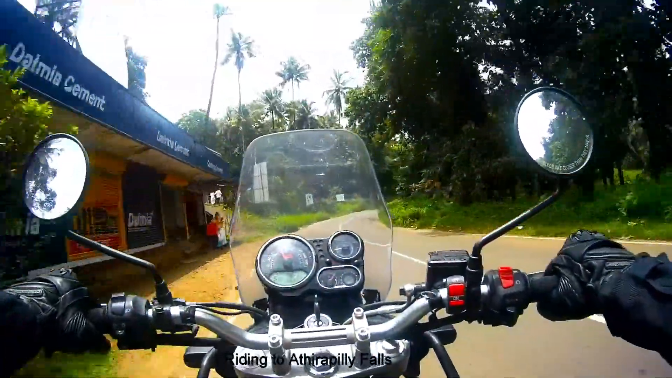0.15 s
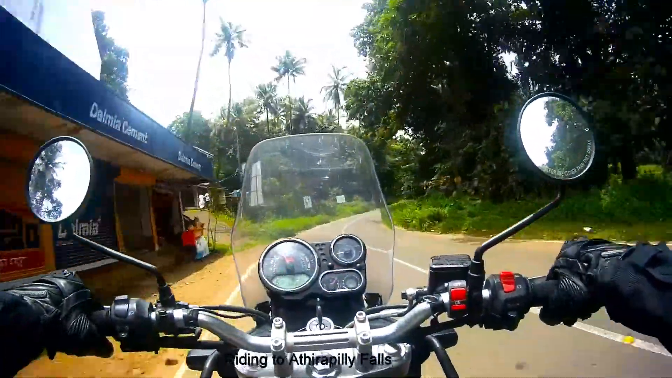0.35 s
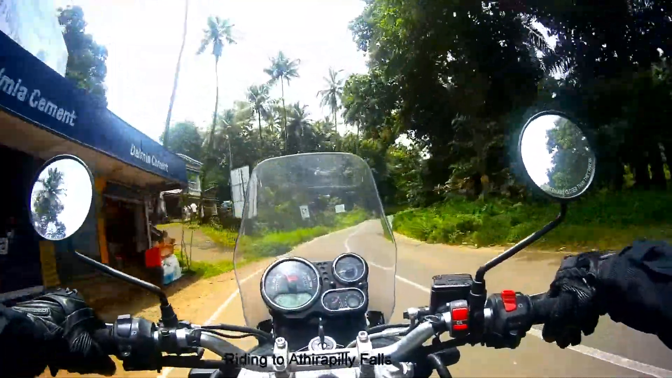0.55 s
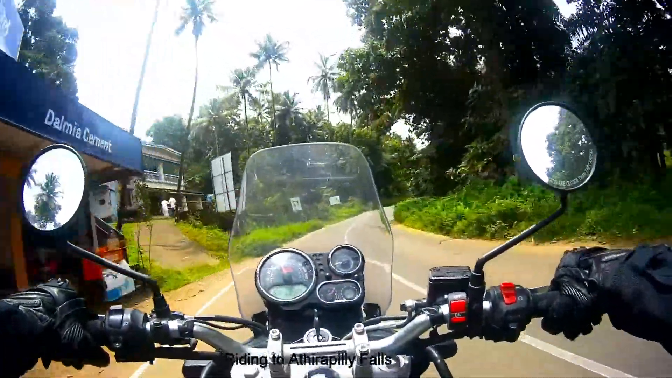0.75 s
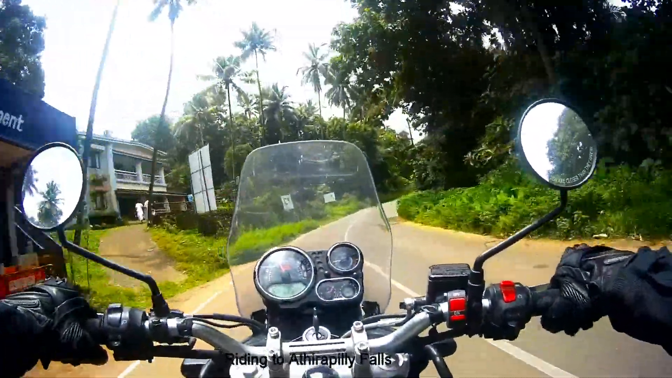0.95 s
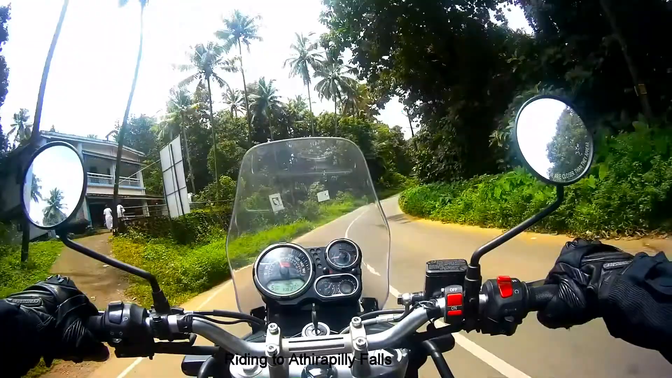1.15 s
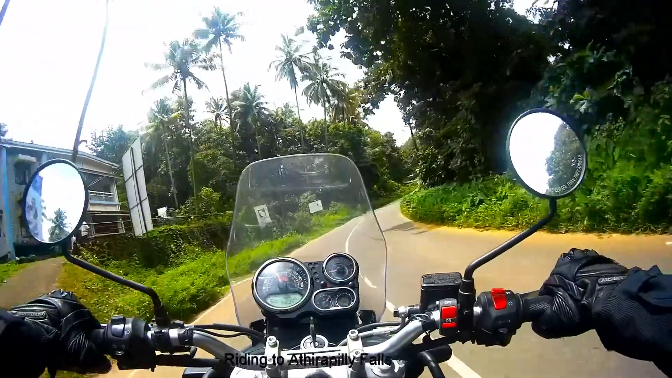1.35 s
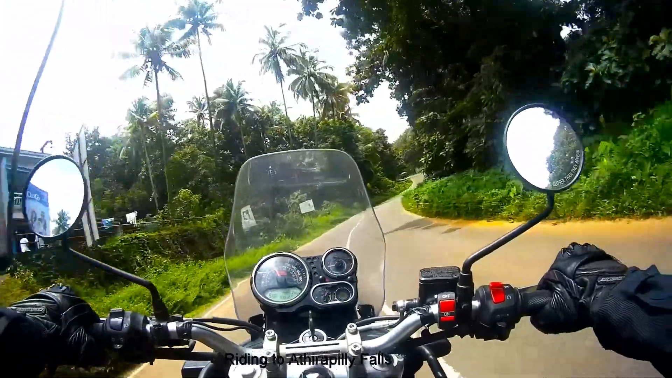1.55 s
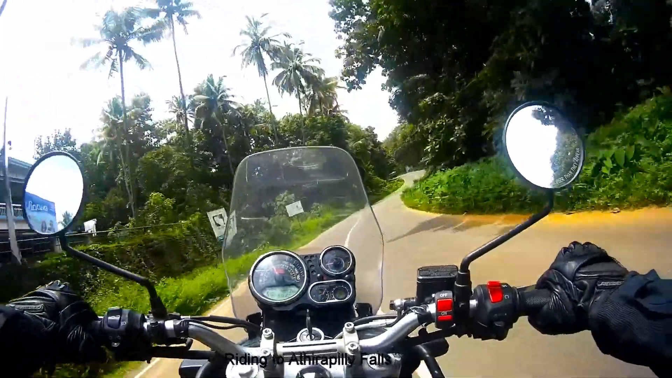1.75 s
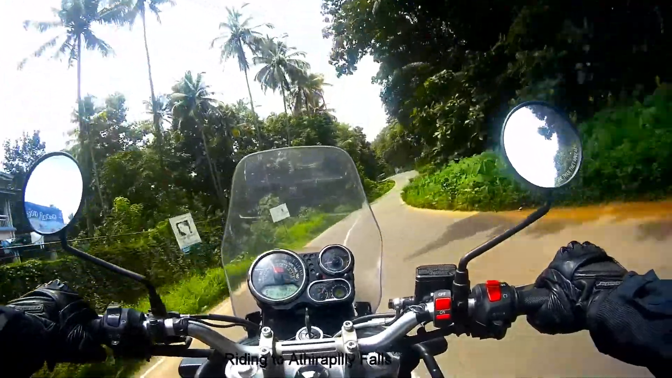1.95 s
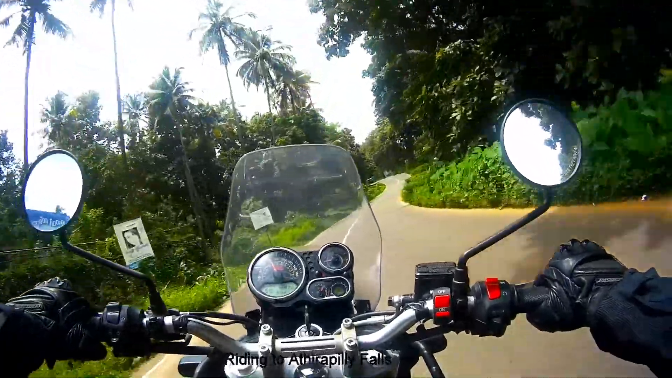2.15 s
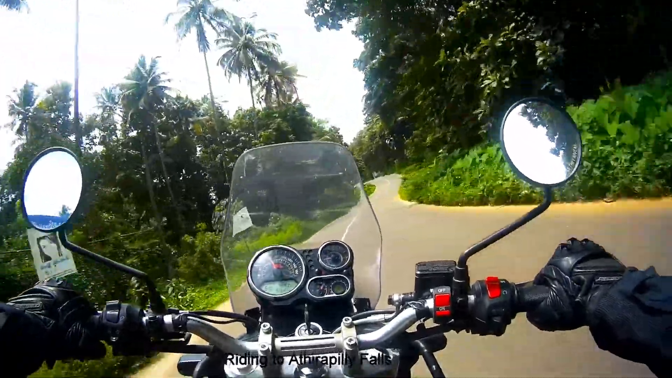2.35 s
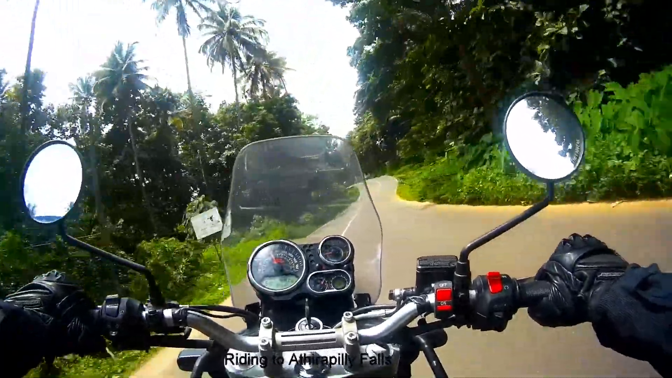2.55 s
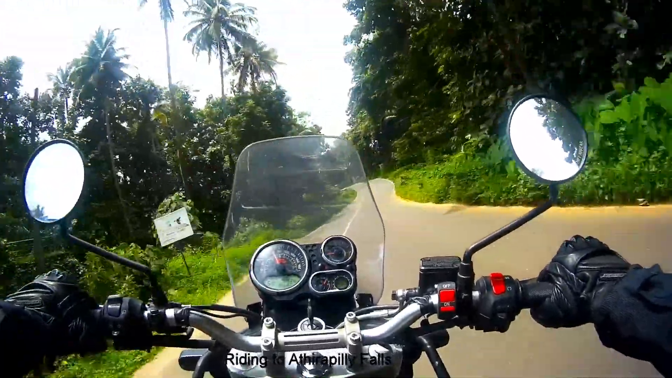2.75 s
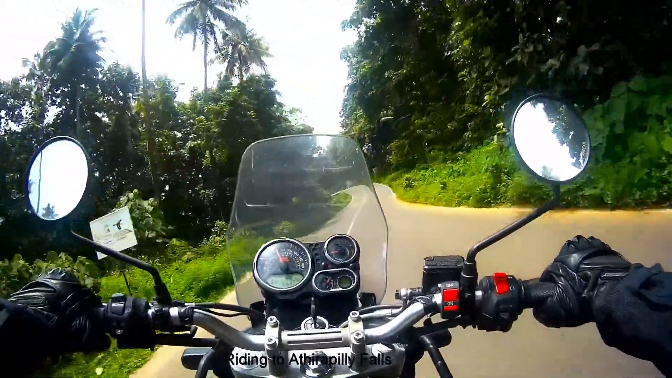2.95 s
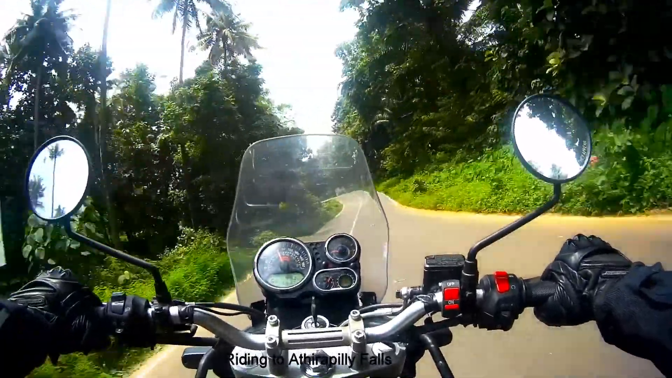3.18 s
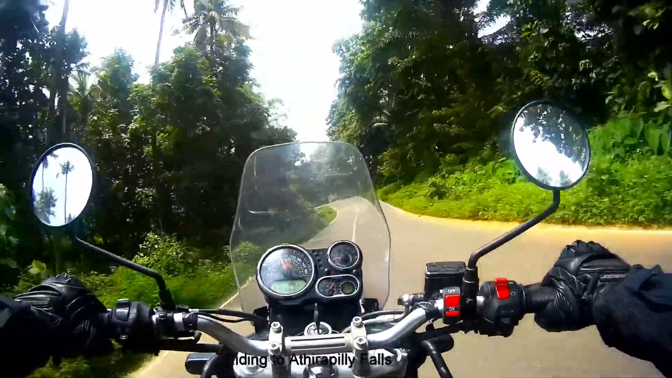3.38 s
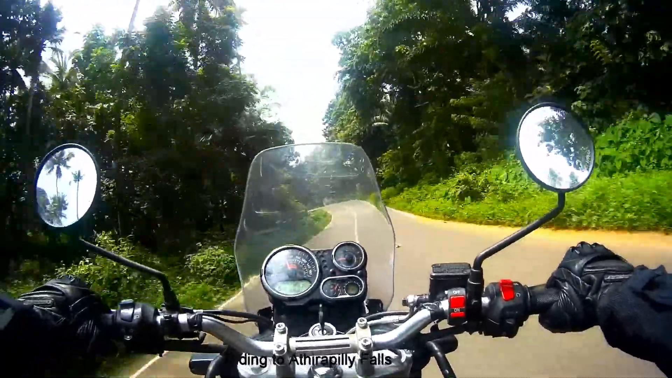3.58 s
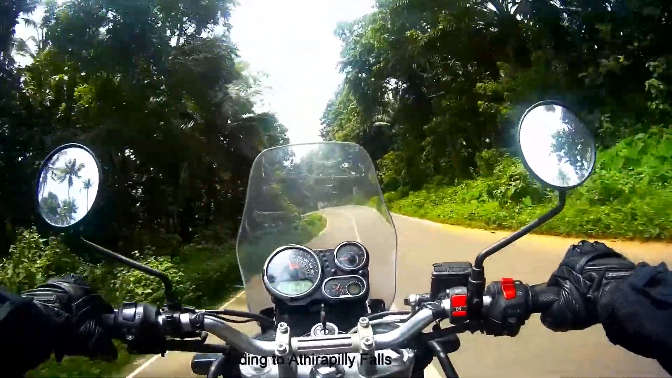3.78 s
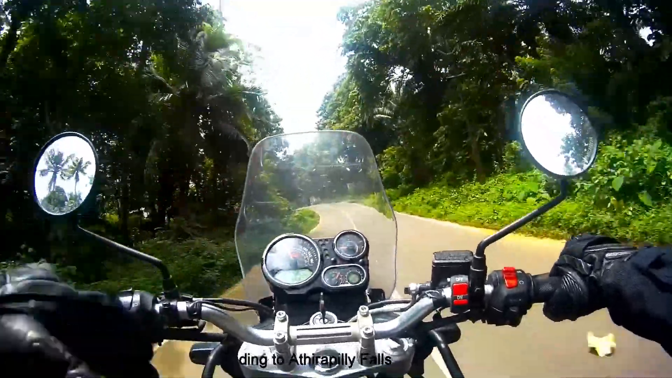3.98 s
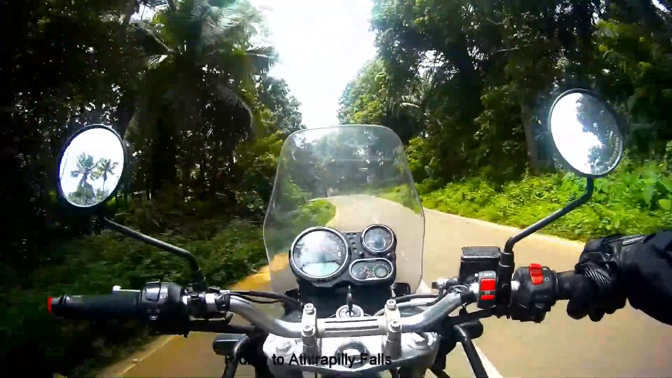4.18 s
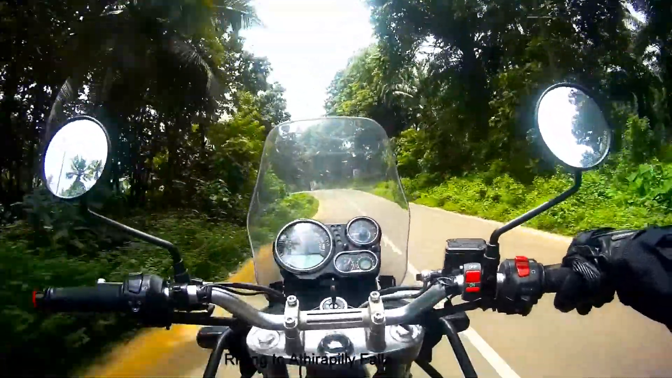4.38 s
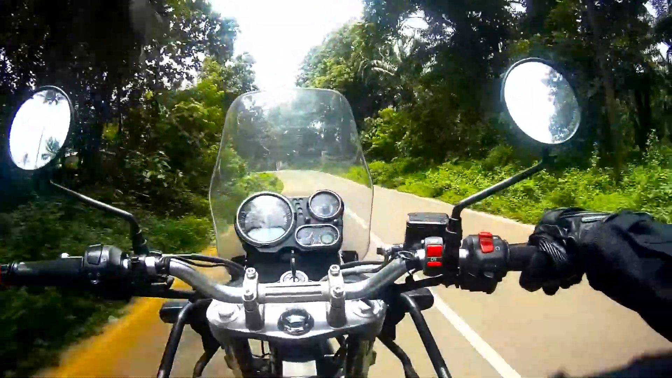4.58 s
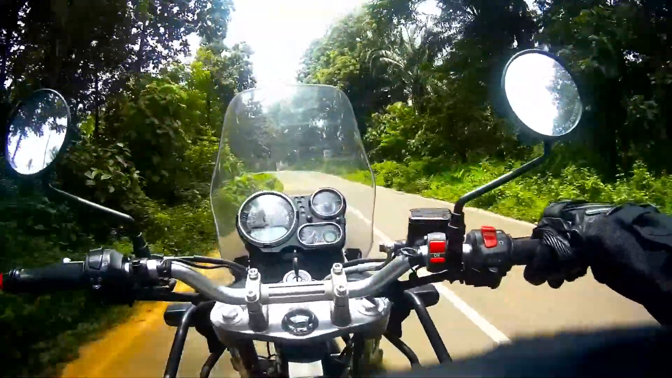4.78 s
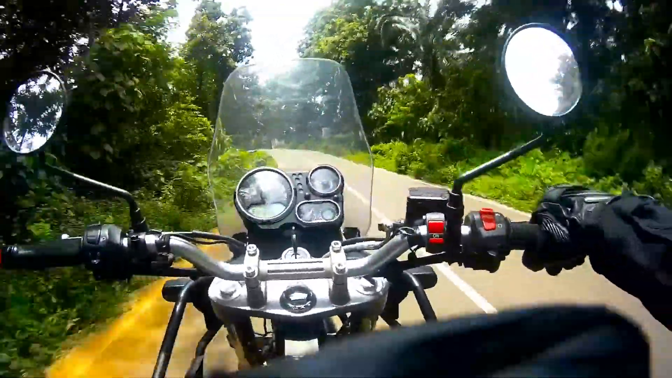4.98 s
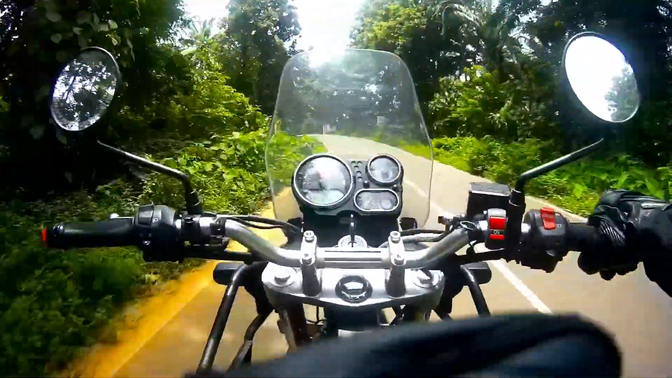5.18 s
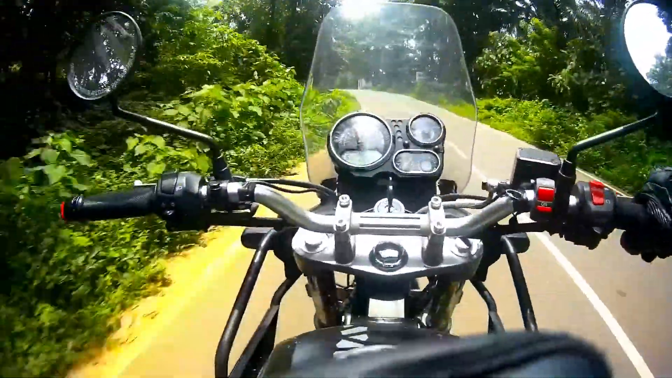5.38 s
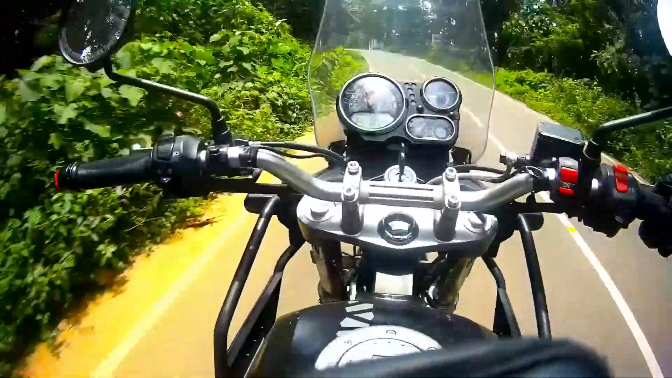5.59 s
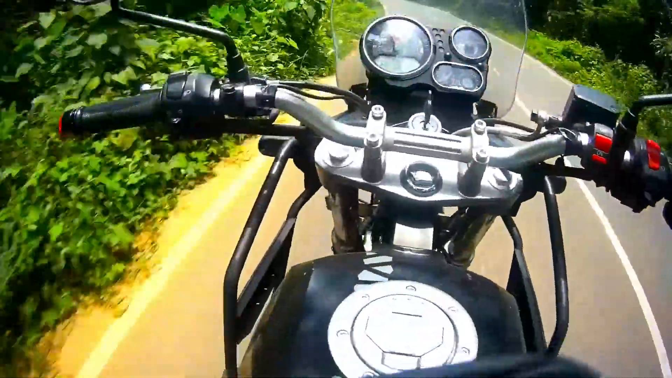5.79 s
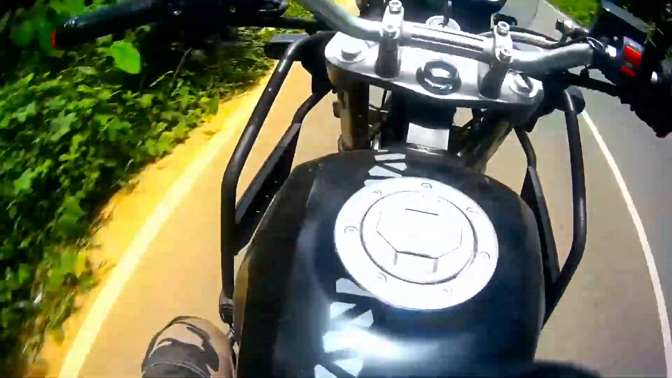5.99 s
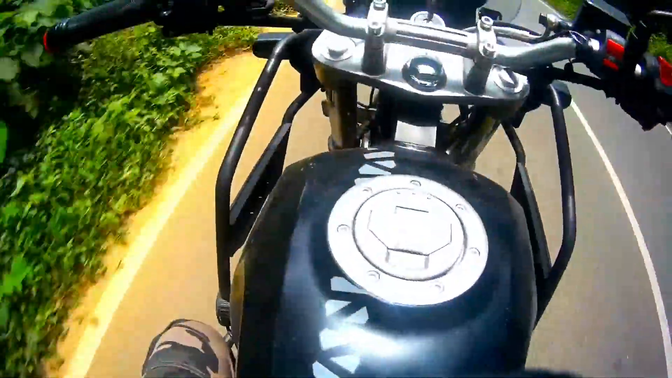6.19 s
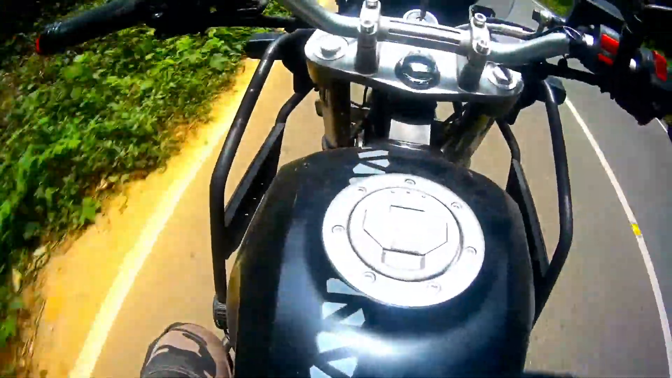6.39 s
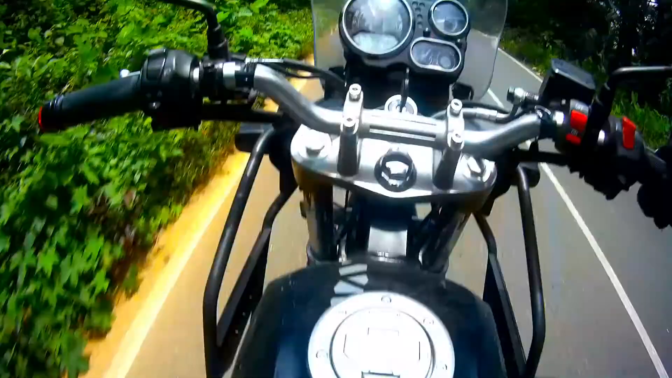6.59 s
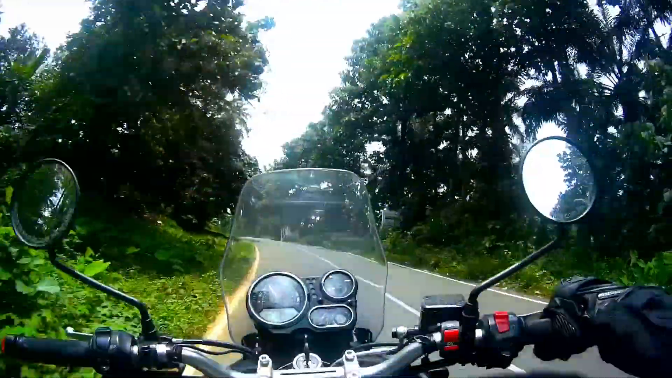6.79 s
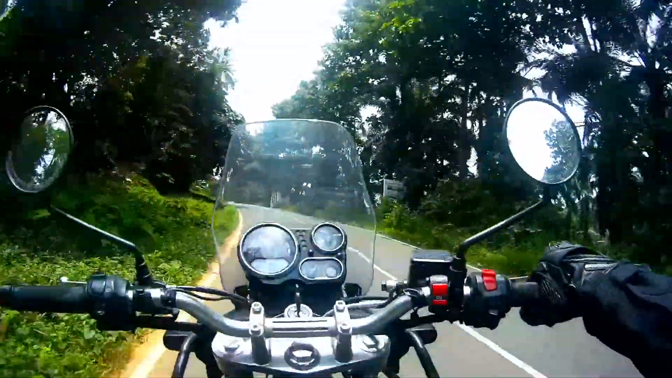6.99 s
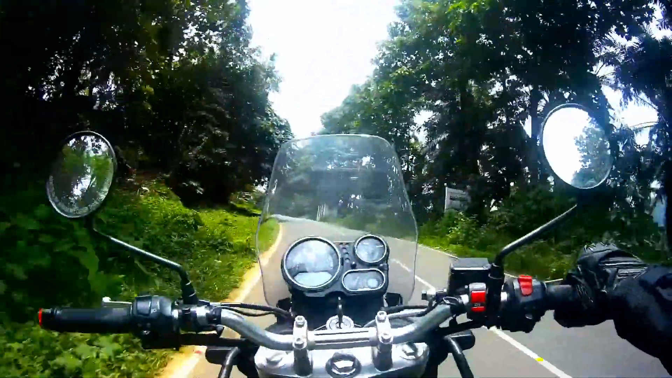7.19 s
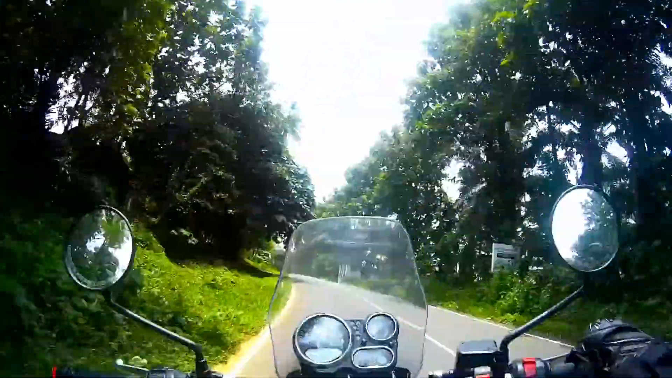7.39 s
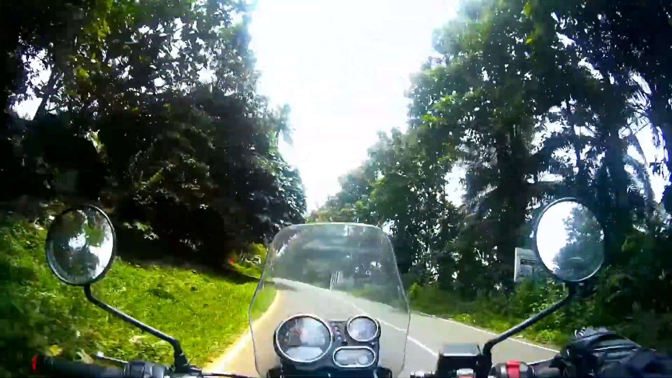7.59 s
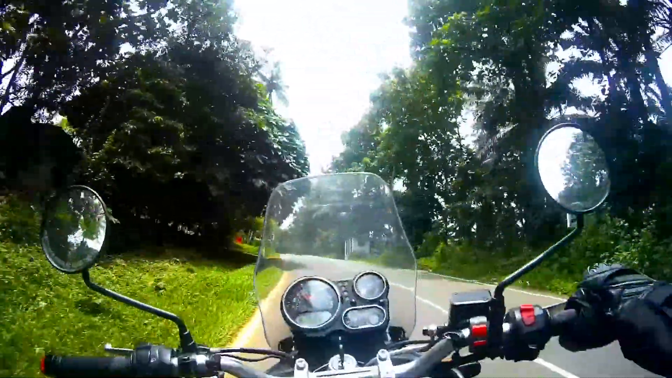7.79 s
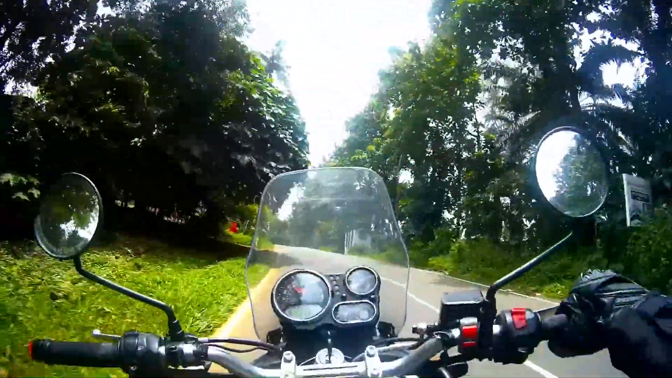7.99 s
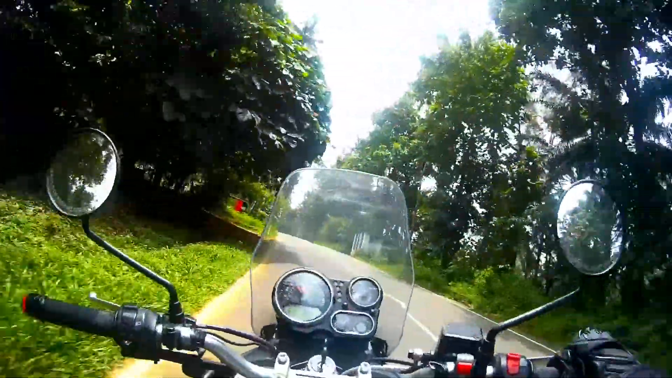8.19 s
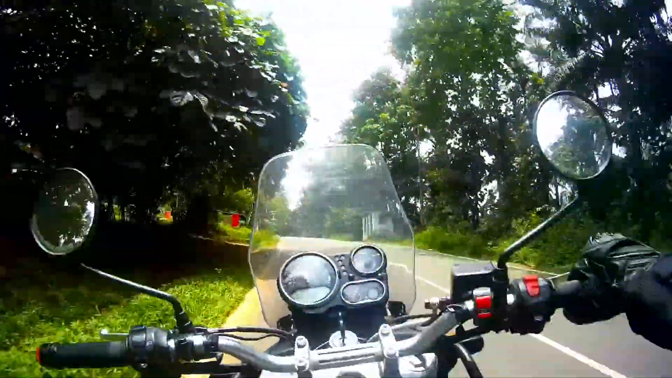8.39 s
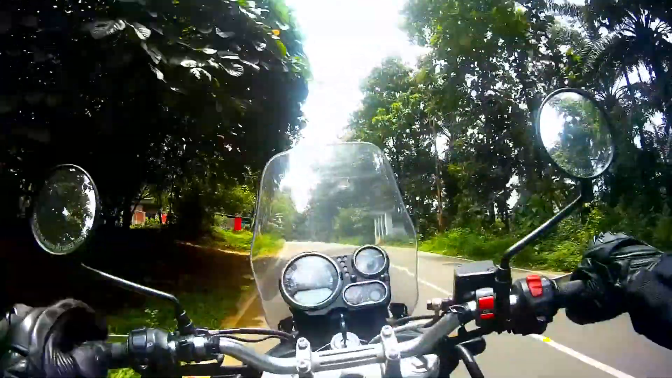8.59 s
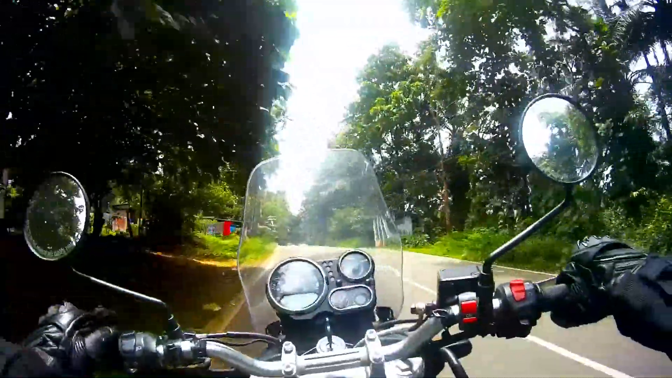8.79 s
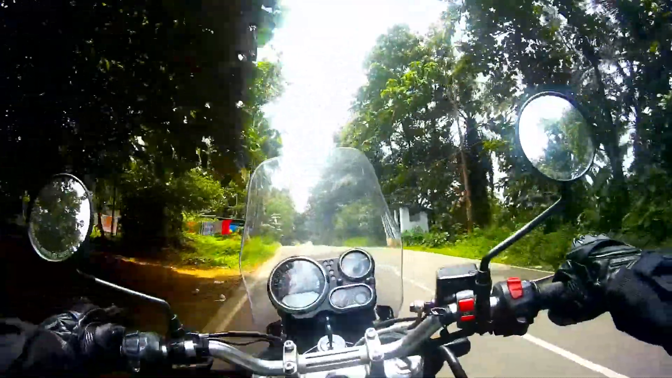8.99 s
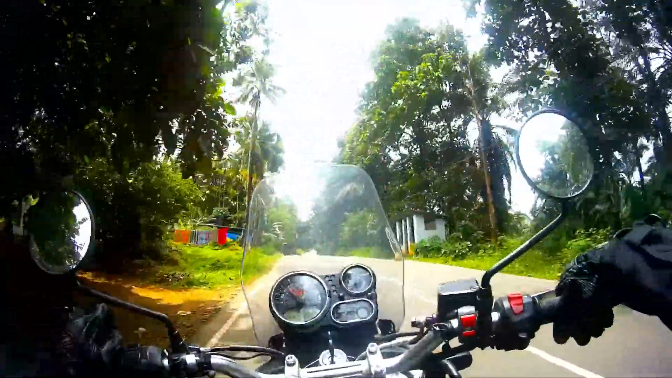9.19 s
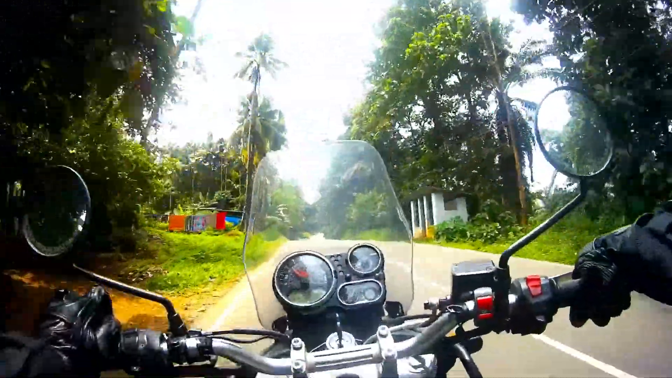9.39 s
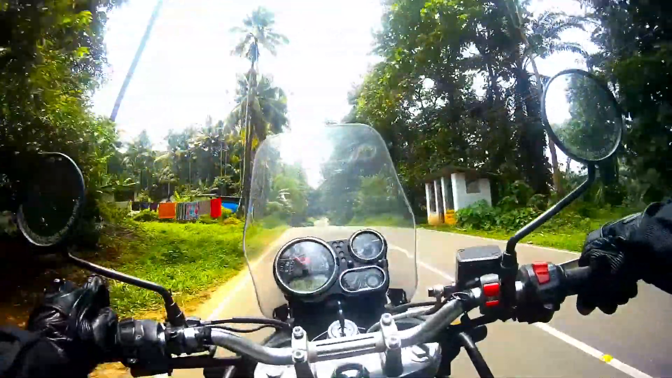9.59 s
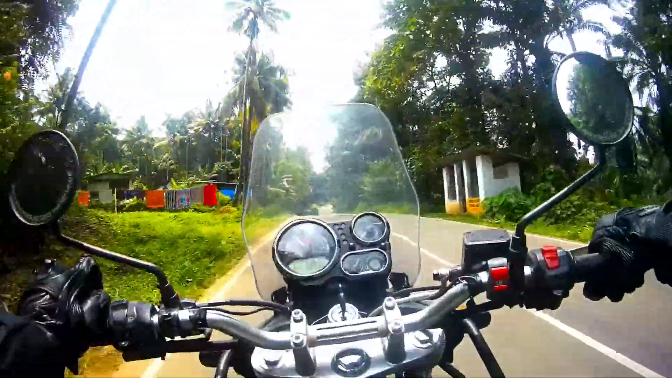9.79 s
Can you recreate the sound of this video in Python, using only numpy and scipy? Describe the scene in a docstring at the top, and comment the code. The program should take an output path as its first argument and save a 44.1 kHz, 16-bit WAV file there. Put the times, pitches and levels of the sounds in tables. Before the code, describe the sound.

A single-cylinder motorcycle drones steadily under lumpy wind buffeting, then a gloved hand rubs and knocks the camera's plastic case in two bouts.

```python
"""On a country road, a single-cylinder motorcycle cruises, heard from a cased camera on the rider.
Engine clatter is noise pulsed by the firings and lifted by the case resonances; the throttle eases,
opens again and closes. Wind is lumpy noise, split into large and small eddies, over a soft rush.
A gloved hand takes hold of the camera and tilts it: stick-slip jerks rub the case, seams snag on it,
knocks ring its modes and shoves thump it."""
import sys
import numpy as np
from scipy import signal
from scipy.fft import rfft, irfft, next_fast_len
from scipy.io import wavfile
from scipy.ndimage import uniform_filter1d, map_coordinates

SR = 44100
rng = np.random.default_rng(int(sys.argv[2]) if len(sys.argv) > 2 else 0)


def generate_wav(signal):
    """Clip the signal to [-1, 1] and save it as 16-bit WAV at the path in sys.argv[1]."""
    frames = np.transpose(np.atleast_2d(signal))
    scaled = np.clip(frames, -1, 1) * 32767
    pcm = np.round(scaled).astype(np.int16)
    wavfile.write(sys.argv[1], SR, pcm)


N = 434385
TIME = np.arange(N) / SR

# Airflow past the rider, which drives both the buffeting and the rush.
# Each row: time [s], airflow level before each layer's trim [dB].
AIRFLOW = [(0, -40.5), (2.3, -40), (3.4, -37.5), (4.4, -41), (5.6, -39), (6.25, -46), (7.2, -43),
           (9.15, -50.5), (9.85, -48)]
# Strokes of the glove on the case.
# Each row: start [s], end [s], force [dB], bite [dB] (low for a soft drag, high for a scratch).
STROKES = [(4.139, 4.156, -31, -20), (4.51, 4.545, -37, 8.5), (4.548, 4.723, -39, -35),
           (4.712, 4.871, -40.5, 4), (4.89, 4.974, -36.5, -0.5), (5.058, 5.085, -37.5, -2),
           (5.498, 5.532, -44, -5), (6.563, 6.624, -36, -14), (6.667, 6.741, -38, -4),
           (6.782, 6.844, -41.5, 0), (6.857, 6.885, -32, -2), (6.914, 6.994, -33, -4.5),
           (7.005, 7.066, -39, 0), (7.16, 7.273, -43, 4), (7.272, 7.326, -33.5, -5),
           (7.594, 7.74, -36, 0.5), (7.759, 7.811, -31.5, 2.5), (7.927, 8, -41, -7),
           (7.999, 8.086, -36, -5), (8.158, 8.28, -39.5, 9.5), (8.314, 8.411, -31, 0.5)]
# share of the bite that reaches the scrape and the snags
SCRAPE_BITE = 0.38


def gain_of(db):
    """Turns decibels into an amplitude factor."""
    return 10 ** (np.asarray(db) / 20)


def evened(x):
    """Scales a signal to rms 1."""
    return x / np.sqrt(np.mean(x ** 2) + 1e-20)


def curve(rows):
    """Draws a control curve through (time, value) rows, one value a sample."""
    return np.interp(TIME, *np.transpose(rows))


def add(mix, s, sound):
    """Mixes a sound in at time s, in seconds."""
    part = mix[round(s * SR):][:len(sound)]
    part += sound[:len(part)]


def coloured(x, points, peaks=()):
    """Filters by a spectrum drawn over log frequency, lifted by bell-shaped resonances."""
    size = next_fast_len(len(x))
    hz = np.fft.rfftfreq(size, 1 / SR)
    point_hz, point_db = np.transpose(points)
    db = np.interp(np.log(hz + 1), np.log(point_hz), point_db)
    for centre, width, lift in peaks:
        db = db + lift / (1 + (2 * (hz - centre) / width) ** 2)
    return irfft(rfft(x, size) * gain_of(db), size)[:len(x)]


def drift(rate):
    """Wanders at random with rms 1, heading for a new value rate times a second."""
    return evened(np.interp(TIME * rate, np.arange(N), rng.standard_normal(N)))


def engine(level_db=1.5, beat=0.89, beat_decay=0.15, drone_db=-7, flutter_db=1.16):
    """Each firing and each return of the piston rattles the engine; a repeating share makes the drone."""
    # Engine speed. Each row: time [s], rate [firings per second].
    firing = [(0, 22.3), (3, 24.2), (3.9, 24.45), (4.6, 24.3), (5.5, 23.2), (6.5, 21.2), (7.3, 22),
              (8.5, 25.3), (9.2, 24.95), (9.85, 24)]
    # Throttle held, eased, opened again and closed. Each row: time [s], engine level before trim [dB].
    load = [(0.0, -47.5), (0.63, -49.5), (3.7, -46), (4.91, -52), (5.1, -56.5), (6.01, -53), (6.67, -57.5),
            (6.88, -53.5), (7.76, -52), (9.0, -51.5), (9.38, -57.5), (9.85, -58.5)]
    # Tone of the engine clatter. Each row: frequency [Hz], relative density [dB per Hz].
    clatter = [(60, -13), (250, 6.5), (420, -3), (520, -8), (715, -7.5), (770, -1.5), (1100, 0.5),
               (1340, -7.5), (1650, -11), (1950, -16.5), (2450, -15), (2780, -26.5), (3800, -26),
               (4500, -45)]
    # Camera-case resonances that lift the clatter. Each row: frequency [Hz], width [Hz], lift [dB].
    case_peaks = [(751, 43, 4.5), (846, 79, 6), (1187.4, 130, 10.5), (2176, 68, 5.5), (3020, 190, 4.5)]
    # Gear whine. Each row: time [s], level about which it flutters [dB].
    whine = [(0, -92), (2.2, -66), (4, -68), (5.9, -63), (6.6, -60.5), (8, -68.5), (8.9, -62),
             (9.85, -76.5)]

    speed = curve(firing) * (1 + 0.001154 * drift(14))
    cycles = np.cumsum(speed) / SR
    # beat_decay is a share of one firing cycle
    firing_blow = np.exp(-(cycles % 1) / beat_decay)
    return_blow = 0.3 * np.exp(-((cycles + .5) % 1) / beat_decay)
    rattle = (1 + beat * (firing_blow + return_blow)) * rng.standard_normal(N)

    # the same noise waveform, read once a firing
    one_cycle = rng.standard_normal(2048)
    drone = map_coordinates(one_cycle, [(cycles % 1) * len(one_cycle)], order=3, mode="grid-wrap")
    source = evened(rattle) + gain_of(drone_db) * drone
    body = evened(coloured(source, clatter, case_peaks))
    body = body * gain_of(curve(load) + level_db + flutter_db * drift(16))

    # 17 gear-whine periods per firing
    gear = np.sqrt(2) * np.sin(2 * np.pi * 17 * cycles)
    return body + gear * gain_of(curve(whine) + 2.4 * drift(20))


def wind(level_db=-0.8, lumpy_db=-0.5, gusty_db=3.0, swell_db=0.57):
    """Eddies off the windscreen strike the case in lumps: large ones rumble, small ones flutter."""
    # Tone of the large eddies. Each row: frequency [Hz], relative density [dB per Hz].
    buffet = [(8, -7.5), (25, -0.5), (55, -3.5), (105, -2), (150, -4), (220, -19), (400, -32), (1000, -65)]
    # Tone of the small eddies. Each row: frequency [Hz], relative density [dB per Hz].
    flutter = [(40, -22), (100, -3.5), (150, 0.5), (220, -1), (280, -7), (400, -17), (600, -24.5),
               (1500, -74)]
    # Loudest gusts on the case. Each row: middle [s], level [dB], half length to 1/e [s].
    gusts = [(0.825, -36.5, 0.13), (1.061, -31, 0.041), (1.403, -35.5, 0.048), (1.71, -33, 0.043),
             (2.65, -35, 0.052), (2.97, -33, 0.035), (5.7, -35.5, 0.11)]
    # power share (0-1) of small eddies that hum in the case, level and tipped down
    small_level, small_tipped = 0.58, 0.19

    large = evened(coloured(rng.standard_normal(N) * gain_of(lumpy_db * drift(35)), buffet))
    small = evened(coloured(rng.standard_normal(N) * gain_of(gusty_db * drift(45)), flutter))
    share = small_level + (small_tipped - small_level) * tilt()
    force = gain_of(curve(AIRFLOW) + level_db + swell_db * drift(11))
    for s, db, length in gusts:
        gust = gain_of(db) * np.exp(-((TIME - s) / length) ** 2)
        force = np.maximum(force, gust)
    return (np.sqrt(1 - share) * large + np.sqrt(share) * small) * force


def tilt():
    """Tells how far the camera is tipped down towards the tank, 0-1."""
    # Each row: time [s], tilt [0-1].
    tipping = [(4.6, 0.5), (5.3, 0.83), (6, 0.97), (6.5, 0.57), (7.1, 0.12), (8.5, 0)]
    return np.clip(curve(tipping), 0, 1)


def glove(slips_per_s=1700, uneven_db=3.5, fade_s=0.016, arch_db=8, linger_s=0.099, linger=0.16, waver_db=1.0):
    """The glove sticks and slips: tiny jerks of uneven size shake the mount, the wall and the corners."""
    # Spectra of a stroke in the case: low shudder, scrape, a flaring upper wall resonance, fine grit.
    # Each row: frequency [Hz], relative density [dB per Hz].
    shudder = [(10, -21), (30, -3.5), (80, -1.5), (150, 1.5), (200, -7), (245, 3.5), (285, -3.5), (330, -9),
               (500, -20), (800, -40), (2000, -74)]
    scrape = [(300, -12.5), (700, -6), (950, -4.5), (1170, 6.5), (1400, -9), (1750, -14.5), (2300, -15),
              (3000, -30), (6000, -69)]
    flare = [(1200, -30), (1550, 3), (1780, 0), (2000, -9), (2600, -36)]
    grit = [(1000, -41), (2200, 4), (2800, 5.5), (3600, 9.5), (4100, 5.5), (4600, -16), (7000, -33),
            (14000, -41)]
    # Each row: spectrum, level against the force in dB, share of the bite added, swing in dB.
    parts = [(shudder, 0, 0, waver_db),
             (scrape, -11.5, SCRAPE_BITE, waver_db),
             (flare, -27, 0, 5),
             (grit, -30, 1, waver_db)]

    jerks = rng.choice([-1, 1], N) * (rng.random(N) < slips_per_s / SR)
    friction = jerks * gain_of(uneven_db * np.clip(drift(160), -2, 2))
    out = np.zeros(N)
    for colour, offset_db, bite_share, swing_db in parts:
        # the point of contact wanders, so each part of the case swells by itself
        shaking = coloured(friction, colour) * gain_of(swing_db * drift(60))
        pressure = np.zeros(N)
        for start, end, force_db, bite_db in STROKES:
            span = slice(round(start * SR), round(max(end, start + .01) * SR))
            # the hand presses hardest in the middle of a stroke
            arch = gain_of(arch_db * np.sin(np.linspace(0, np.pi, span.stop - span.start)))
            force = gain_of(force_db + offset_db + bite_share * bite_db)
            pressure[span] = force * arch / (np.std(arch * shaking[span]) + 1e-9)
        press = uniform_filter1d(pressure, max(round(fade_s * SR), 1))
        # the glove also brushes the case lightly before and after each stroke
        brush = uniform_filter1d(press, max(round(linger_s * SR), 1))
        out += shaking * ((1 - linger) * press + linger * brush)
    return out


def snags(spread_db=8.0, count=4):
    """Now and then a seam of the glove catches during a stroke and gives the case a small blow."""
    snags_per_s, snag_db = 14, -4.5  # average rate; level against the stroke's force
    force = np.zeros(N)
    for start, end, force_db, bite_db in STROKES:
        force[round(start * SR):round(end * SR)] = gain_of(force_db + snag_db + SCRAPE_BITE * bite_db)
    out = np.zeros(N)
    # count different blows share the catches
    for _ in range(count):
        caught = rng.random(N) < snags_per_s / count / SR
        catches = caught * gain_of(spread_db * rng.uniform(-1.5, 1, N))
        impact = blow(hz=1300, weight_db=0, hard_db=-25, length=0.74)
        out += signal.oaconvolve(catches * force, impact)[:N]
    return out


def knocks(lead_s=0.00037):
    """Fingers knock on the plastic case with a tick, and it sometimes chatters; now and then the mount's joint
    clicks."""
    # Knocks on the case. Each row: time [s], wall peak level [dB], wall pitch [Hz],
    # weight on the mount [dB], hardness [dB], ring length [factor], rebounds [count].
    hits = [(4.2317, -31, 1280, -9, -1.5, 1.6, 0), (4.2717, -40, 1230, -15, -1, 1, 0),
            (4.51, -27, 1310, 0, -12.5, 1.2, 0), (4.545, -9.5, 1130, -7, -12.5, 1.56, 0),
            (4.8299, -32, 1250, 6.5, 1.5, 1.7, 0), (4.862, -27, 1130, -7, -32, 1.5, 0),
            (4.9616, -19, 1350, 6, -10, 1.3, 0), (4.9665, -22, 1130, 13.5, -12, 2.2, 0),
            (5.112, -32.5, 1310, -18, -1, 4.1, 0), (5.1677, -43, 1290, 6, -2, 1.4, 0),
            (5.2655, -31, 1210, -21, -9, 3.1, 0), (5.2892, -24.5, 1196, -8, -14, 4.3, 0),
            (5.513, -37.5, 1350, -15, -4, 1.8, 0), (6.6657, -31.5, 1190, 5, -9, 0.83, 0),
            (6.7934, -42, 1220, 16.5, 4.5, 0.64, 0), (6.858, -15, 1360, -8, -10.5, 1.1, 2),
            (6.887, -38, 1290, 3, 3, 0.68, 0), (6.9359, -42, 1170, 18.5, 8, 1, 0),
            (7.265, -25, 1250, -20, -9, 2.4, 0), (7.273, -19, 1274, -16, -8, 2.2, 0),
            (7.3766, -29.5, 1150, -2, -32, 1.2, 0), (7.626, -20.5, 1247, 1, -20, 3.9, 0),
            (7.635, -24, 1530, 4, -20, 0.86, 1), (7.6667, -29, 1380, -8, -16, 1.7, 1),
            (7.7053, -32, 1140, 2, -32, 1.3, 0), (7.754, -28.5, 1200, -5, -10, 1.4, 0),
            (8.0075, -10.5, 1166, -18, -22, 1.05, 1), (8.04, -25.5, 1130, -8, -24, 2.4, 1),
            (8.0605, -28.5, 1350, -7, -21, 0.71, 0), (8.199, -34, 1180, -2, -0.5, 1.2, 0),
            (8.2676, -34.5, 1180, -2, -1, 1.1, 0), (8.3662, -16.5, 1190, 0.5, -2.5, 0.62, 0),
            (8.3708, -26, 1380, 5.5, -9, 0.84, 0), (8.39, -25.5, 1430, -14, -6, 0.7, 0),
            (8.4062, -20.5, 1220, -2.5, -13.5, 2.3, 0)]
    # Clicks of the camera mount's joint, each the same crack as a knock's tick. Each row: time [s], gain on the
    # tick [dB].
    extra_ticks = [(4.963, -45), (4.984, -49), (6.667, -51), (7.71, -46), (8.3665, -47)]
    # chatter: gap between rebounds, first one's level against the knock, change at each further one
    rebound_s, rebound_db, rebound_step_db = .0098, -16, -7
    # tick: level against the knock, and dB more per dB of hardness
    tick_db, tick_per_hard = -32, 0.55

    out = np.zeros(N)
    for s, db, hz, weight_db, hard_db, length, count in hits:
        contact = gain_of(tick_db + tick_per_hard * hard_db) * tick()
        impact = contact + blow(hz, weight_db, hard_db, length)
        add(out, s - lead_s, gain_of(db) * impact)
        for k in range(round(count)):
            bounce_db = db + rebound_db + k * rebound_step_db
            bounce = gain_of(bounce_db) * blow(hz, weight_db, hard_db, length)
            add(out, s + (k + 1) * rebound_s, bounce)
    for s, db in extra_ticks:
        add(out, s, gain_of(db) * tick())
    return out


def tick(decay_s=.0025, rise_s=.0008):
    """Hard plastic cracks: a short burst of bright noise."""
    # Each row: frequency [Hz], relative density [dB per Hz].
    crack = [(1000, 18), (4500, 6.5), (7500, -0.5), (9500, -5.5), (14000, -10)]
    t = np.arange(SR // 10) / SR
    noise = coloured(rng.standard_normal(len(t)), crack)
    return noise * np.exp(-t / decay_s) * (1 - np.exp(-t / rise_s))


def blow(hz, weight_db, hard_db, length):
    """One blow rings the case's wall, mount and corners; more length stretches it towards a short creak."""
    # Modes of the mount. Each row: frequency [Hz], relative level [dB], 60 dB decay time [s].
    mount_modes = [(136, -13, 0.035), (244.7, -1, 0.022), (373, -1, 0.0087), (576, -14.5, 0.014)]
    # Modes of the wall. Each row: multiple of its pitch, relative level [dB],
    # 60 dB decay time before the length factor [s].
    wall_modes = [(.7, -15, 0.036), (.98, 11.5, 0.0091), (1.34, -0.5, 0.0085)]
    # Modes of the corners. Each row: frequency [Hz], relative level [dB],
    # 60 dB decay time before the root of the length factor [s].
    corner_modes = [(1730, 6.5, 0.026), (2307, 9.5, 0.015), (2720, 3.5, 0.0091), (3210, 1, 0.014),
                    (3410, -4.5, 0.017), (3810, -3, 0.012), (5300, -29, 0.0069), (6330, -27, 0.011)]
    length = max(length, .3)
    wall = ring(wall_modes, rise=0.00093, pitch=hz, length=length)
    mount = gain_of(weight_db) * ring(mount_modes, rise=0.0016)
    corners = gain_of(hard_db) * ring(corner_modes, rise=0.00055, length=np.sqrt(length))
    return -(wall + mount + corners)


def ring(modes, rise, pitch=1, length=1):
    """Dying modes with a soft start, peak 1; each blow lands on another spot and so mixes them differently."""
    t = np.arange(SR // 10) / SR
    sound = np.zeros(len(t))
    for hz, db, t60 in modes:
        level_chance, pitch_chance = rng.standard_normal(2)
        level = gain_of(db + 1.5 * level_chance - 60 * t / (t60 * length))
        sound += level * np.sin(2 * np.pi * hz * pitch * (1 + .025 * pitch_chance) * t)
    sound = sound * (1 - np.exp(-(t / rise) ** 2))
    return sound / abs(sound).max()


def thumps():
    """A shove pushes the case one way on its mount and lets it swing back."""
    # Each row: middle [s], peak level [dB], pitch [Hz], half length to 1/e [s].
    shoves = [(4.9655, -8, 227, 0.007), (4.98, -22.5, 36, 0.018), (6.6, -27.5, 72.5, 0.018),
              (7.788, -23, 169, 0.0015), (8.0555, -13.5, 111, 0.0031), (8.37, -14.5, 428, 0.0019),
              (8.43, -32, 45.3, 0.018)]
    out = np.zeros(N)
    t = np.arange(-SR // 10, SR // 10) / SR
    for s, db, hz, length in shoves:
        swing = np.sin(2 * np.pi * hz * t) * np.exp(-(t / length) ** 2)
        add(out, s + t[0], gain_of(db) * swing / abs(swing).max())
    return out


def rush(flutter_db=1):
    """Air and tyres roar softly, less as the airflow drops and when the camera faces down."""
    # Each row: frequency [Hz], relative density [dB per Hz].
    roar = [(100, 0.5), (300, -1.5), (480, 2), (680, -3.5), (1000, -17), (1250, -0.5), (1600, -6.5),
            (2000, -16), (2700, -26), (3700, -25.5), (4600, -38)]
    cruise_db, rush_db = -41, -53  # airflow at cruising speed, and the rush level it gives
    shelter_db = -16  # when fully tipped down
    level_db = rush_db + (curve(AIRFLOW) - cruise_db) + shelter_db * tilt()
    noise = evened(coloured(rng.standard_normal(N), roar))
    return noise * gain_of(level_db + flutter_db * drift(25))


def scene():
    """Sums the ride and the handling at one microphone."""
    ride = engine() + wind() + rush()
    handling = glove() + snags() + knocks() + thumps()
    return (ride + handling)[None]


def record(dry, hiss_db=-73):
    """Adds the microphone's own hiss, then limits the band with a steep lowpass."""
    # Each row: frequency in Hz, relative density in dB per Hz.
    hiss_tone = [(1000, 2.5), (5000, 2.5), (8000, 0), (13000, -.5), (14200, -6), (15500, -26)]
    edge_hz = 15300
    hiss = evened(coloured(rng.standard_normal(N), hiss_tone))
    lowpass = signal.firwin(151, edge_hz, window=("kaiser", 8), fs=SR)
    return signal.oaconvolve(dry + gain_of(hiss_db) * hiss, lowpass[None], "same")


dry = scene()
out = record(dry)
generate_wav(out)
```